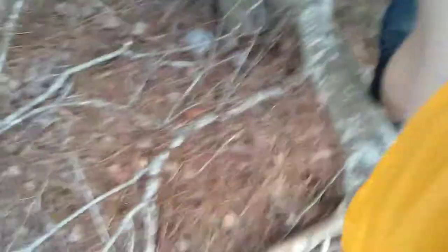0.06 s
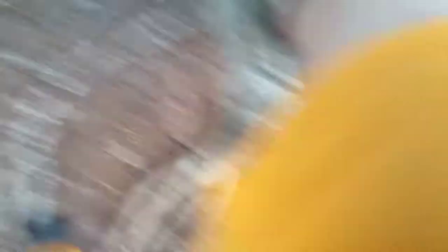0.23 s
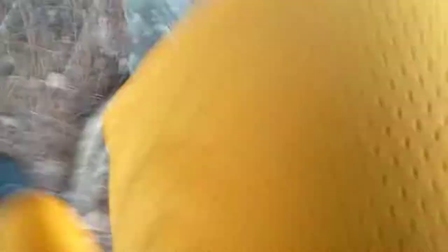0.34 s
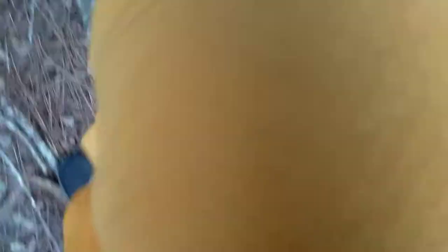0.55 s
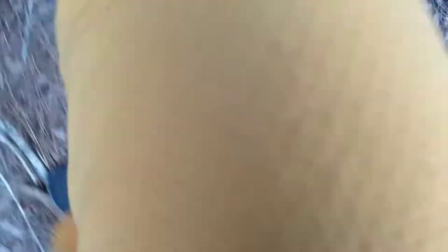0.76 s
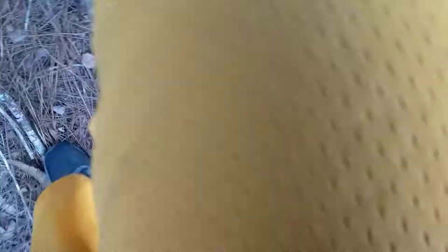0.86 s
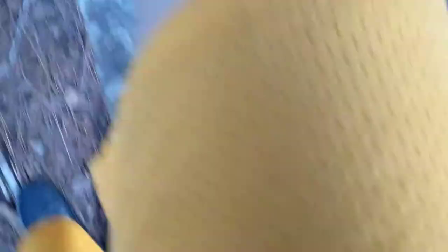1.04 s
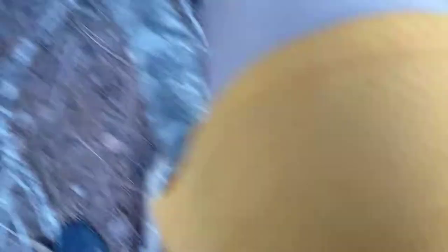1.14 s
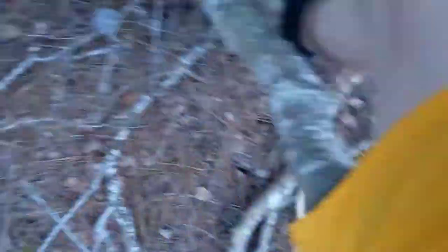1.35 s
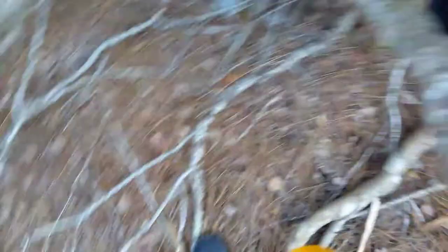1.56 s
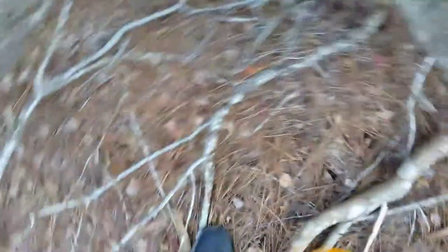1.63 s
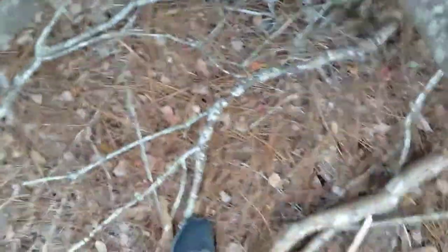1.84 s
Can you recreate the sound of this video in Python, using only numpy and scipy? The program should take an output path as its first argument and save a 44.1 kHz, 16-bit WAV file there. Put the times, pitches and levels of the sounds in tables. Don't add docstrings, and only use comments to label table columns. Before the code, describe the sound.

Sharp wood splintering, led by a brief rustle and quick swish and backed by a low ground thump, gives way to sparse ticks over dry needles in a quiet yard, close and slightly overloaded.

```python
import sys
import numpy as np
from scipy import signal
from scipy.fft import rfft, irfft, next_fast_len
from scipy.io import wavfile
from scipy.ndimage import uniform_filter1d, map_coordinates

SR = 44100
rng = np.random.default_rng(int(sys.argv[2]) if len(sys.argv) > 2 else 0)


def generate_wav(signal):
    frames = np.transpose(np.atleast_2d(signal))
    scaled = np.clip(frames, -1, 1) * 32767
    pcm = np.round(scaled).astype(np.int16)
    wavfile.write(sys.argv[1], SR, pcm)


def gain_from_db(level_db):
    decades = np.asarray(level_db, float) / 20
    return 10 ** decades


N = 83790

# frequency in Hz, level in dB per Hz.
BRIGHT_COLOUR = [(1760, -44.5), (3000, -37.5), (4730, -17.5), (6090, -14), (7830, -12.5), (9530, -0.5),
                 (11000, -6.5), (13500, -5.5), (16000, -15)]


def unit(x):
    return x / np.sqrt(np.mean(x ** 2) + 1e-20)


def curves(rows):
    s, *cols = np.transpose(rows)
    return [np.interp(np.arange(N) / SR, s, c) for c in cols]


def wobble(rate):
    knots = rng.standard_normal(int(N * rate / SR) + 4)
    return map_coordinates(knots, [np.arange(N) * rate / SR])


def coloured(x, points):
    m = 2 ** 17
    f, db = np.transpose(points)
    log_hz = np.log(np.fft.rfftfreq(m, 1 / SR) + 1)
    gain = gain_from_db(np.interp(log_hz, np.log(f + 1), db)) + 1e-5
    cepstrum = irfft(np.log(gain / np.sqrt(np.mean(gain ** 2))), m)
    cepstrum[1:m // 2] *= 2
    cepstrum[m // 2 + 1:] = 0
    return irfft(rfft(x, m) * np.exp(rfft(cepstrum)), m)[:N]


def tinted(count):
    knots = rng.standard_normal((2, 16))
    spectrum = rfft(rng.standard_normal((2, count)))
    place = 15 * np.sqrt(np.linspace(0, 1, spectrum.shape[1]))
    tint_db = 2.5 * np.array([map_coordinates(k, [place]) for k in knots])
    return irfft(spectrum * gain_from_db(tint_db), count)


def narrow(hz, width_hz):
    pole = np.exp(-2 * np.pi * width_hz / SR)
    a, b = signal.lfilter([1], np.poly([pole, pole]), rng.standard_normal((2, N)))
    phase = 2 * np.pi * np.cumsum(hz * np.ones(N)) / SR
    return unit(a * np.sin(phase) + b * np.cos(phase))


def ring(t, db, hz, cycles):
    rise = 1 - np.exp(-(t * hz) ** 2)
    return gain_from_db(db - 25 * t * hz / cycles) * rise * np.sin(2 * np.pi * hz * t)


def add(track, s, x):
    part = track[round(s * SR):][:len(x)]
    part += x[:len(part)]


def snaps():
    # start in seconds, peak in dB, woody part in dB, t60 in seconds.
    crack_rows = [(0.2241, -7, -17.5, 0.11), (0.226, -8, -6, 0.052), (0.2264, -4.5, 1, 0.031),
                  (0.2291, -6.5, -4.5, 0.012), (0.237, -10, -5, 0.055), (0.2447, -3.5, 5.5, 0.014),
                  (0.2451, -10.5, 0.5, 0.041), (0.251, -9, -1, .03), (0.2564, -9, -8.5, 0.048),
                  (0.2639, -7, 4, .016), (0.2657, -4, -8.5, 0.017), (0.27, -8.5, -9, 0.043),
                  (0.2835, -6.5, -14.5, .011), (.2897, -0.5, -4.5, 0.012), (0.2908, -7.5, -3, 0.02),
                  (0.298, -3, -7, 0.019), (0.3021, -11.5, -0.5, .044), (.309, -11, -3.5, 0.055),
                  (0.316, -4.5, -5.5, 0.026), (0.3337, -5.5, -24.5, .008), (0.3378, -14, -4, 0.076),
                  (0.3496, -2.5, -10.5, 0.022), (0.3725, -1.5, -9, 0.008), (0.375, -20.5, 1.5, 0.049),
                  (0.4029, -30, -25, 0.016)]
    # start in seconds, peak in dB, woody part in dB, t60 in seconds, click in dB.
    twig_rows = [(.449, -30.5, 5, 0.069, -22), (.4562, -9, -12, 0.034, 5.5), (.4662, -12, -14, 0.03, 5),
                 (.5028, -25.5, -8.5, 0.044, -5), (.5335, -39, -5, 0.075, 0), (.548, -21, -8.5, .03, -9),
                 (.554, -26.5, -14, 0.039, -2), (.5636, -37, 6, 0.035, -20), (.5726, -23.5, -8, 0.037, -10),
                 (.6109, -13.5, -1.5, 0.027, -7), (.6222, -25, 3.5, 0.042, -8),
                 (.6544, -51, -1, 0.041, -12), (.6741, -35.5, -15.5, .048, -12.5),
                 (.7092, -17.5, -15, 0.03, -19.5), (.7155, -18.5, -14, 0.05, -9),
                 (.731, -30, -7, 0.065, -11), (0.7409, -27.5, -7.5, .05, -25),
                 (.7817, -32.5, -13, 0.072, -16), (.824, -32, -8, .045, -5),
                 (.8682, -16.5, -20.5, 0.0096, 0.5), (.8985, -31, -14.5, 0.089, -16),
                 (.9145, -29, -19, 0.011, 3), (.932, -42, -8, 0.022, -2), (.9549, -42, -6, 0.025, -6),
                 (.9835, -37, -12.5, .028, -6)]
    # start in seconds, peak in dB,
    # woody part in dB.
    tick_rows = [(.087, -46.5, -20), (.129, -50, -10), (1.034, -34, -12.5), (1.0521, -34, -15),
                 (1.0979, -38, -24), (1.1234, -38.5, -28), (1.145, -33.5, -35), (1.1585, -39, -31),
                 (1.197, -41, -13), (1.2203, -44.5, -12), (1.361, -47.5, -35), (1.3785, -47, -3.5),
                 (1.3806, -36.5, -12.5), (1.4223, -40, -4.5), (1.4983, -37.5, -16), (1.503, -45, -25),
                 (1.5293, -41, -18), (1.563, -63, -3), (1.600, -48, -14.5), (1.7268, -44, -8),
                 (1.856, -64.5, -11.5)]
    # frequency in Hz, level in dB per Hz.
    woody_colour = [(300, -26), (900, -5), (1600, -3.5), (2600, -3.5), (3400, -3), (5000, -1.5),
                    (8000, -15.5), (16000, -45.5)]
    attack_s, click_t60_s, tail_longer, spiky_db = 0.00015, 0.005, 8.4, 3.5

    # t60 in seconds, click in dB; then the tail in dB
    events = [(*row, 3.5, -14.5) for row in crack_rows]
    events += [(*row, -14.5) for row in twig_rows]
    events += [(*row, 0.032, -22, -9) for row in tick_rows]

    bright, woody, t = np.zeros(N), np.zeros(N), np.arange(SR // 6) / SR
    for s, db, wood_db, t60, click_db, tail_db in events:
        bright_noise, woody_noise = tinted(len(t))
        lumps = unit(uniform_filter1d(rng.standard_normal(len(t)), size=32))
        click = gain_from_db(click_db - 60 * t / click_t60_s)
        burst = gain_from_db(-60 * t / t60)
        tail = gain_from_db(tail_db - 60 * t / (tail_longer * t60))
        shape = click + gain_from_db(spiky_db * lumps) * (burst + tail)
        shape = shape * (1 - np.exp(-t / attack_s))
        add(bright, s, gain_from_db(db - 12.5) * shape * bright_noise)
        add(woody, s, gain_from_db(db - 17.5 + wood_db) * shape * woody_noise)
    return coloured(bright, BRIGHT_COLOUR) + coloured(woody, woody_colour)


def splinter_rings():
    # start in seconds, peak in dB, pitch in Hz, cycles to die.
    ring_rows = [(.3332, -7.5, 4860, 6.4), (.372, -15.5, 4930, 7.2), (0.4033, -12.5, 15040, 25),
                 (1.4, -63, 1660, 28), (1.381, -64.5, 1200, 27), (0.61, -20.5, 3110, 9.3),
                 (1.4232, -53.5, 1760, 6), (1.563, -60.5, 850, 6), (.3765, -27, 1020, 6.8),
                 (1.727, -50.5, 380, 11), (0.23, -32, 930, 5), (.333, -33.5, 280, 6),
                 (.2315, -16.5, 720, 6), (0.292, -16.5, 620, 3.6), (.315, -19, 800, 5),
                 (1.4225, -55.5, 910, 7.1), (1.4, -49, 3300, 5.8)]
    out, t = np.zeros(N), np.arange(SR // 8) / SR
    for s, db, hz, cycles in ring_rows:
        add(out, s, ring(t, db + 4, hz, cycles))
    return out


def thuds():
    # start in seconds, peak in dB, pitch in Hz, cycles to die, push +1 or pull -1.
    thud_rows = [
        (0.2298, -11, 464.6, 3.7, -1),
        (0.2335, -15, 150, 3, 1),
        (0.2438, -0.5, 431.7, 0.85, -1),
        (0.2466, -12, 377.5, 1.9, -1),
        (0.2479, -13, 80, 1.4, 1),
        (0.2634, -11, 522, 2.9, -1),
        (.270, -11, 84.8, 2.2, 1),
        (0.2906, -6, 230.5, 0.93, 1),
        (0.298, -15.5, 909, 6.6, 1),
        (.308, -24, 113.5, 2.6, 1),
    ]
    out, t = np.zeros(N), np.arange(SR // 8) / SR
    for s, db, hz, cycles, sign in thud_rows:
        add(out, s, sign * gain_from_db(db - 25 * t * hz / cycles) * np.sin(2 * np.pi * hz * t))
    return out


def pricks():
    # start in seconds, peak in dB, pitch in Hz.
    prick_rows = [(.005, -35, 9600), (0.012, -58, 7040), (.028, -57.5, 7100), (.038, -51, 9500),
                  (0.048, -43, 9900), (.051, -52, 10940), (0.067, -50, 10700), (0.0867, -46, 10500),
                  (.094, -45, 9400), (0.1282, -34, 9400), (0.183, -34, 9400), (.2441, -8, 12600),
                  (.2662, -5, 13020), (0.3333, -0.5, 9894), (.3336, -6.5, 13520), (0.3372, -11, 5480),
                  (0.3719, -6, 13500), (0.6116, -17, 7000), (.8688, -21, 10450), (.7465, -31, 5500),
                  (0.9606, -46.5, 4500), (1.2717, -46, 9260), (1.3086, -53.5, 9470), (1.3645, -48, 8500),
                  (1.369, -48, 12000), (1.448, -48, 11140), (1.489, -59.5, 10470), (1.529, -29.5, 8300),
                  (1.5475, -40, 11270), (1.552, -54, 9500), (1.566, -55, 10500), (1.576, -50, 9060),
                  (1.5861, -41, 10000), (1.601, -44, 8540), (1.6068, -40, 10460), (1.638, -43.5, 8970),
                  (1.6857, -53.5, 10060), (1.7297, -44, 8000), (1.747, -45, 8500), (1.796, -48, 8550),
                  (1.8255, -50, 10670), (1.866, -46, 7000)]
    cycles, fizz_db, fizz_t60_s = 4.4, -13, 0.0033
    out, fizz, t = np.zeros(N), np.zeros(N), np.arange(SR // 50) / SR
    for s, db, hz in prick_rows:
        add(out, s, ring(t, db + 10.5, hz, cycles))
        add(fizz, s, gain_from_db(db + fizz_db - 60 * t / fizz_t60_s) * rng.standard_normal(len(t)))
    return out + coloured(fizz, BRIGHT_COLOUR)


def swish():
    # time in seconds, pitch in Hz, level in dB.
    swing_rows = [
        (0.141, 380, -72),
        (0.189, 690, -64.5),
        (0.211, 863, -39),
        (.222, 1060, -28.5),
        (.228, 1030, -64),
    ]
    hz, db = curves([(0.0088, 302, -120), *swing_rows, (0.25, 994, -120)])
    return gain_from_db(db) * narrow(hz, 150)


def scuffs():
    # start in seconds, length in seconds, level in dB, pitch in Hz, width in Hz.
    scuff_rows = [(0.27, .34, -56.5, 450, 351), (0.521, 0.094, -50, 455, 129),
                  (1.2076, 0.019, -61.5, 3630, 121.5), (1.375, 0.038, -68, 664, 350),
                  (1.582, 0.08, -63, 1920, 161.2), (1.663, 0.11, -67.5, 515.3, 324),
                  (1.709, 0.1, -58.5, 439, 138.7), (1.618, 0.37, -63.5, 381, 293),
                  (1.831, 0.08, -61, 432, 170), (1.696, 0.39, -58.5, 8805, 2020),
                  (1.845, .07, -60.5, 9370, 833.3)]
    out, t = np.zeros(N), np.arange(N) / SR
    for s, length, db, hz, width_hz in scuff_rows:
        swell = np.sin(np.pi * np.clip((t - s) / length, 0, 1)) ** 2
        out += gain_from_db(db + 4.2 * wobble(80)) * swell * narrow(hz, width_hz)
    return out


def needles():
    # time in seconds, level in dB.
    stir_rows = [(0, -60), (.08, -63.5), (.10, -52.5), (.165, -52.5), (.215, -41.5), (.23, -29), (.40, -49),
                 (.60, -65), (.70, -75), (.72, -56.5), (1.02, -58.5), (1.05, -57.5), (1.17, -62.5),
                 (1.29, -68), (1.40, -64.5), (1.47, -67.5), (1.58, -60.5), (1.69, -66), (1.9, -55)]
    # frequency in Hz, level in dB per Hz.
    needle_colour = [(590, -45), (1000, -17.5), (2560, -22), (3580, -19.5), (4730, -22), (8500, -13),
                     (9450, -3.5), (11200, -10), (16000, -18.5)]
    grains_per_s, grain_spread_db, grain_t60_s, hiss_share = 1800, 4, 0.013, 0.37
    stir_db, = curves(stir_rows)
    struck = rng.random(N) < grains_per_s / SR
    ticks = struck * gain_from_db(grain_spread_db * np.minimum(rng.exponential(1, N), 2.5))
    decay = gain_from_db(-60 / (grain_t60_s * SR))
    grains = signal.lfilter([1], [1, -decay], ticks) * rng.standard_normal(N)
    mix = unit(grains) * (1 - hiss_share) + hiss_share * rng.standard_normal(N)
    level_db = stir_db - 3.5 + 0.61 * wobble(52) + 1.1 * wobble(14)
    return gain_from_db(level_db) * coloured(unit(mix), needle_colour)


def yard():
    # time in seconds, level in dB.
    rumble_rows = [(0, -55.5), (.3, -60.5), (.6, -68), (1.25, -74), (1.4, -69), (1.9, -59.5)]
    # frequency in Hz, level in dB per Hz.
    rumble_colour = [(15, -42), (25, -12.5), (118, 5), (173, -8.5), (555, -19.5), (1190, -23), (1410, -25),
                     (3170, -43.5), (4000, -38), (5200, -52), (8800, -120)]
    level_db, = curves(rumble_rows)
    rumble = gain_from_db(level_db + 1.4 * wobble(11)) * coloured(rng.standard_normal(N), rumble_colour)
    hum = gain_from_db(-73.5) * narrow(114, 6.0)
    return rumble + hum


def scene():
    breaking = snaps() + splinter_rings() + thuds() + pricks()
    return (breaking + swish() + scuffs() + needles() + yard())[None]


def roll_off(x):
    return signal.sosfilt(signal.butter(12, 16640, fs=SR, output="sos"), x)


def record(dry):
    clip_top, low_cut_hz, top_hz = 0.9, 38, 15600
    squeezed = dry / (1 + np.abs(dry / clip_top) ** 4) ** (1 / 4)
    m = next_fast_len(N + 8192)
    hz = np.fft.rfftfreq(m, 1 / SR)
    band_limit = gain_from_db(np.interp(hz, [top_hz - 200, top_hz + 100, top_hz + 1000], [0, -28, -45]))
    low_cut = 1j * hz / (low_cut_hz + 1j * hz)
    mix = irfft(rfft(squeezed, m) * band_limit * low_cut, m)[:, :N]
    return roll_off(mix)


dry = scene()
out = record(dry)
generate_wav(out)
```